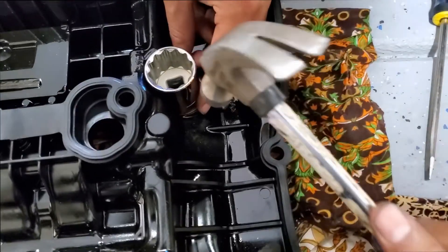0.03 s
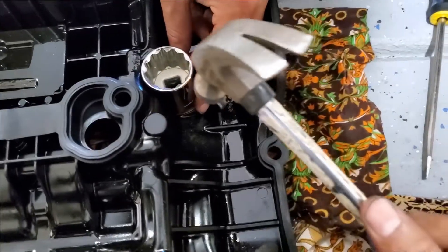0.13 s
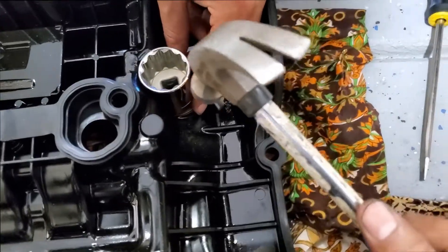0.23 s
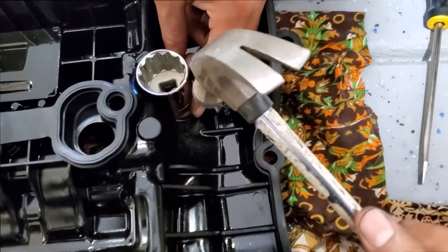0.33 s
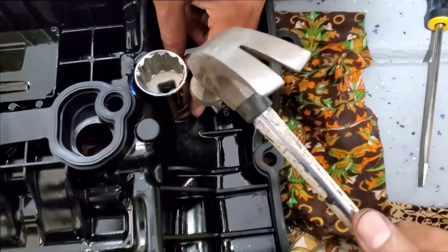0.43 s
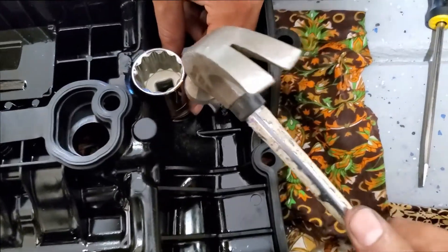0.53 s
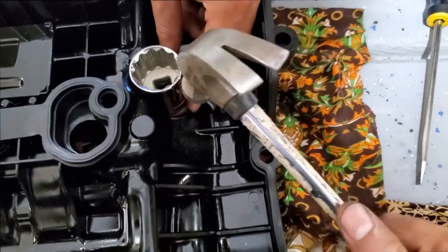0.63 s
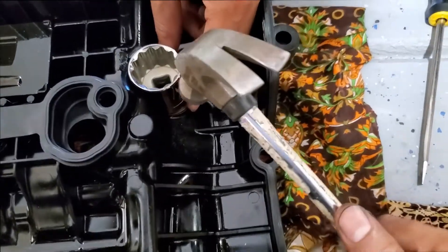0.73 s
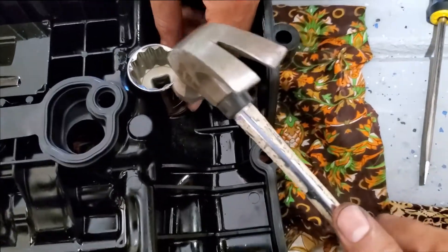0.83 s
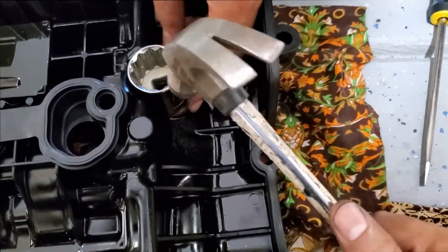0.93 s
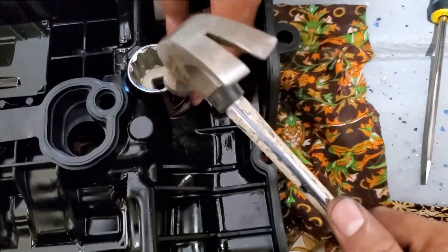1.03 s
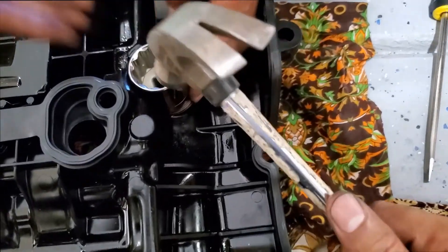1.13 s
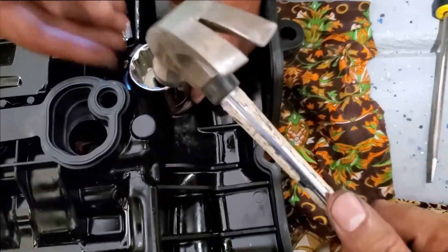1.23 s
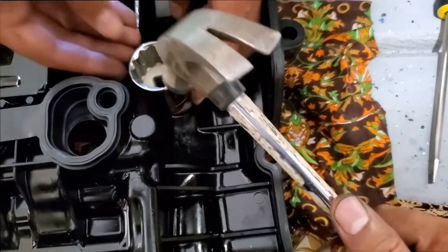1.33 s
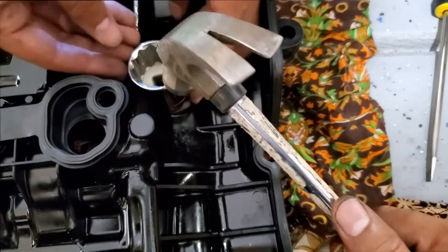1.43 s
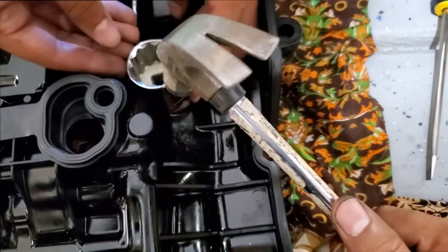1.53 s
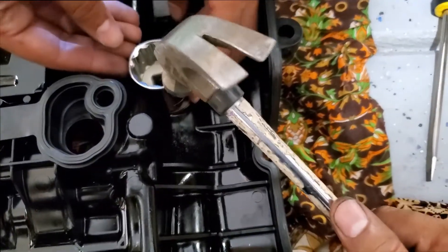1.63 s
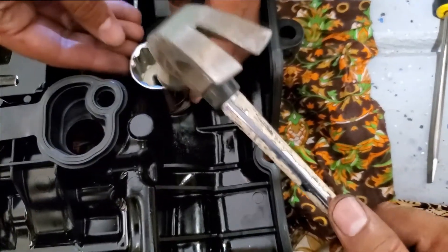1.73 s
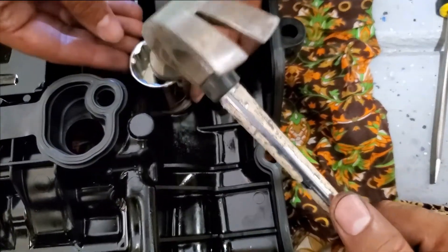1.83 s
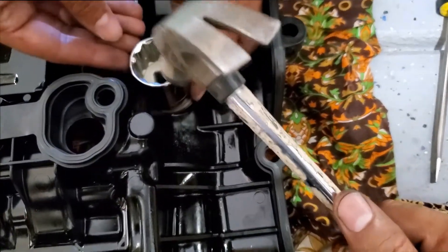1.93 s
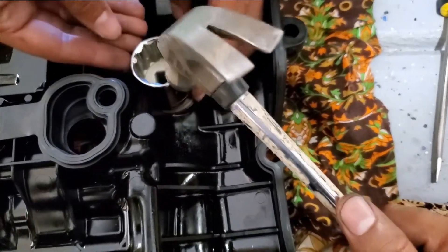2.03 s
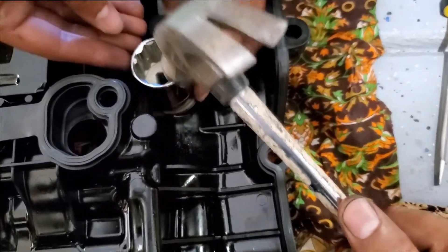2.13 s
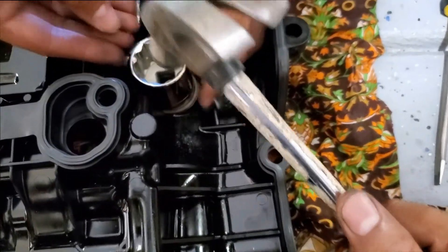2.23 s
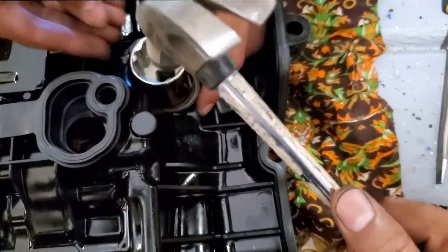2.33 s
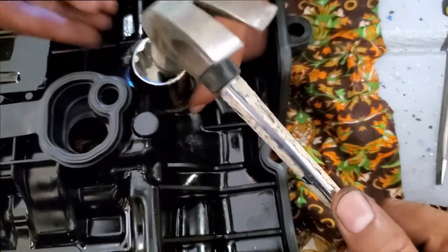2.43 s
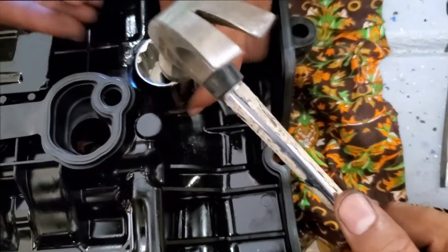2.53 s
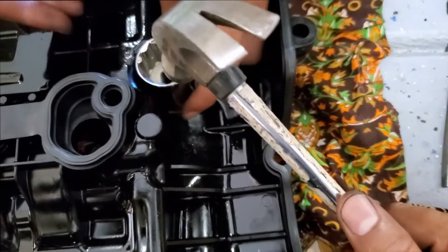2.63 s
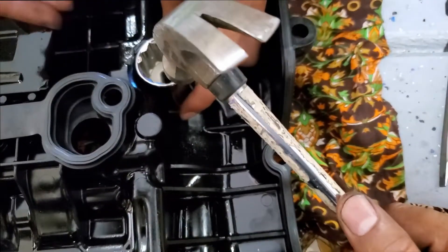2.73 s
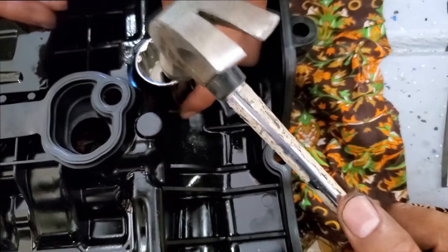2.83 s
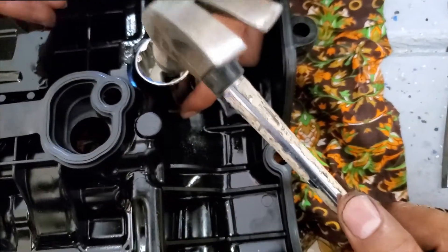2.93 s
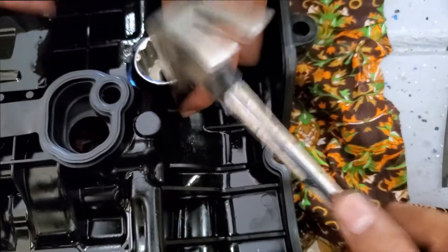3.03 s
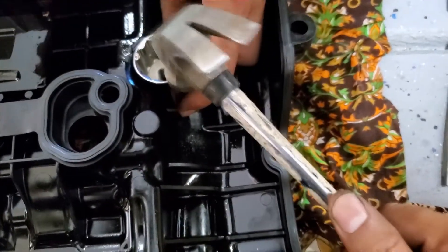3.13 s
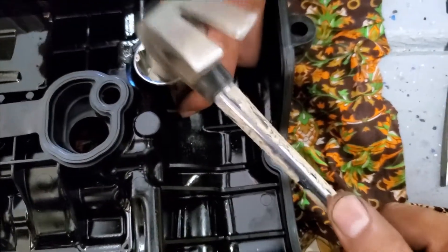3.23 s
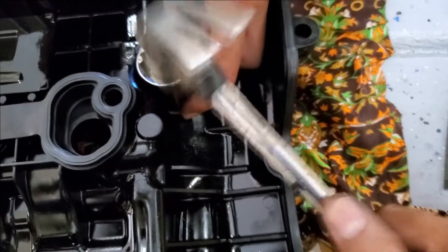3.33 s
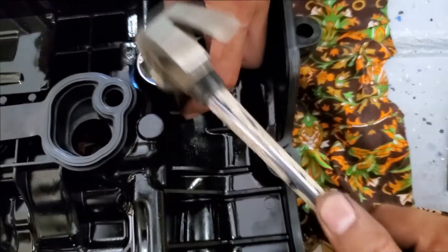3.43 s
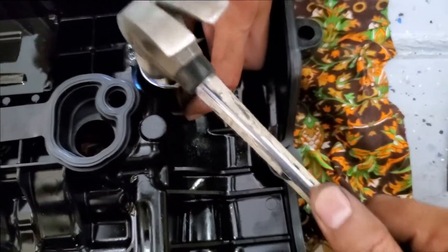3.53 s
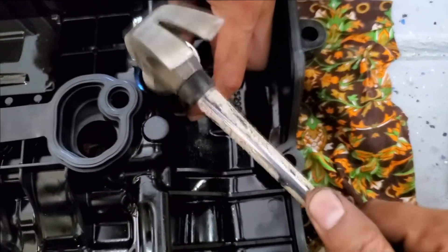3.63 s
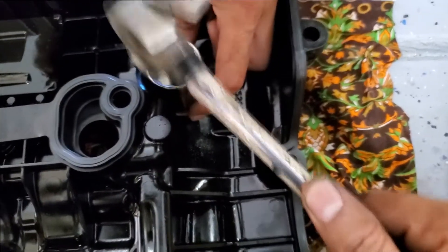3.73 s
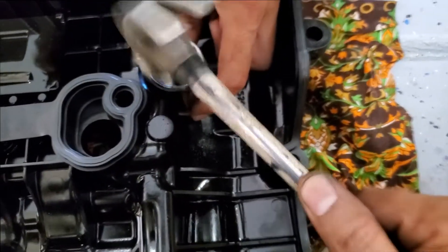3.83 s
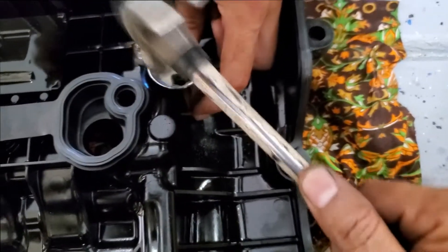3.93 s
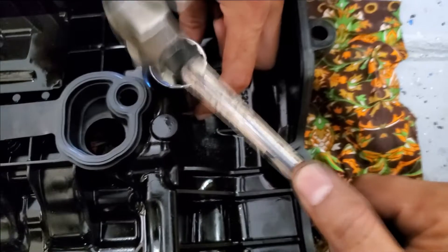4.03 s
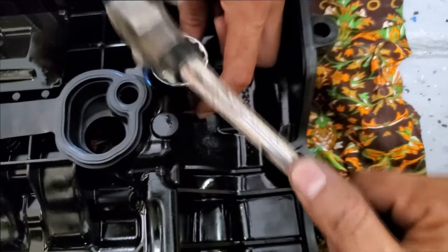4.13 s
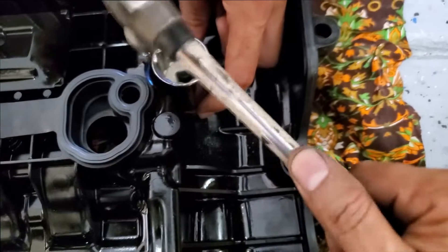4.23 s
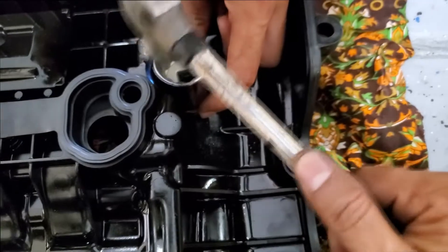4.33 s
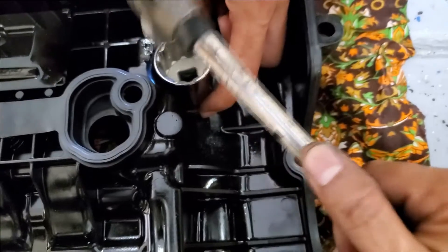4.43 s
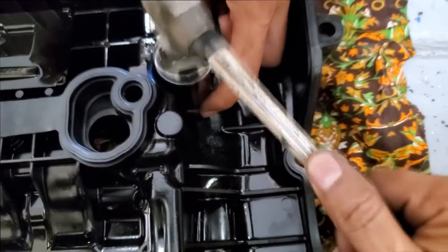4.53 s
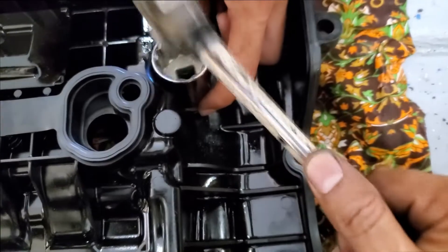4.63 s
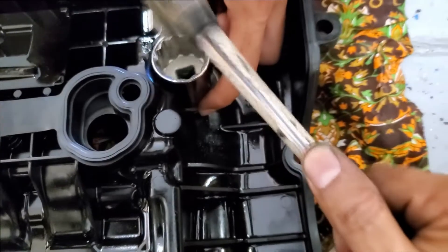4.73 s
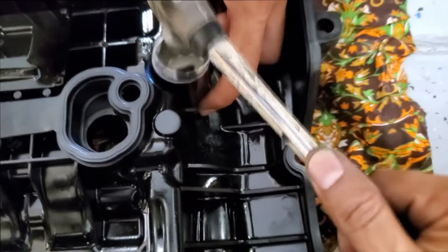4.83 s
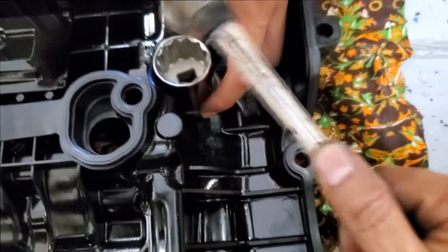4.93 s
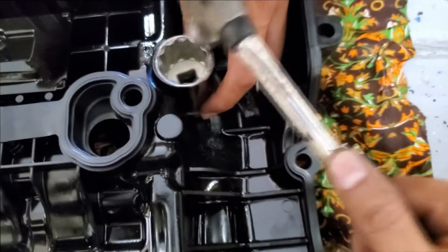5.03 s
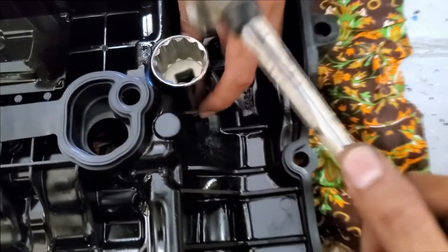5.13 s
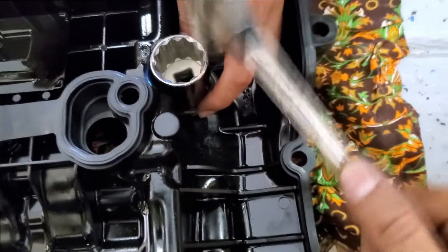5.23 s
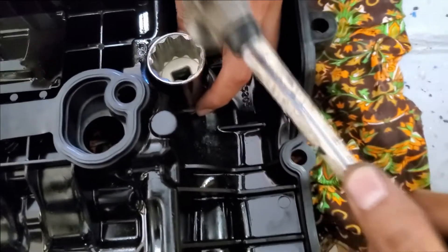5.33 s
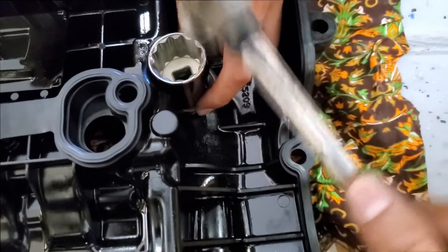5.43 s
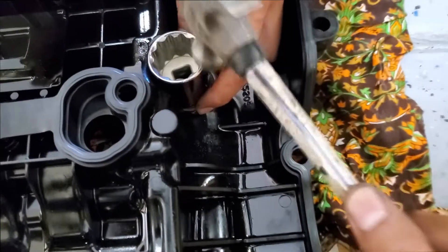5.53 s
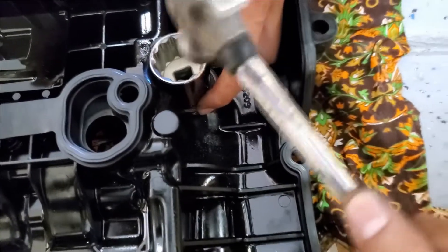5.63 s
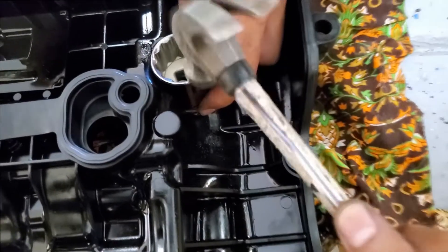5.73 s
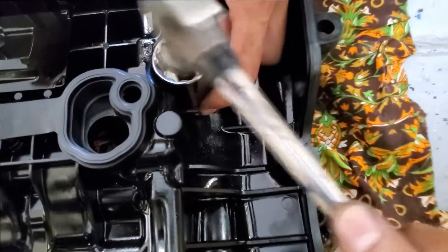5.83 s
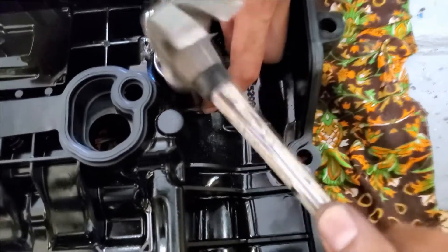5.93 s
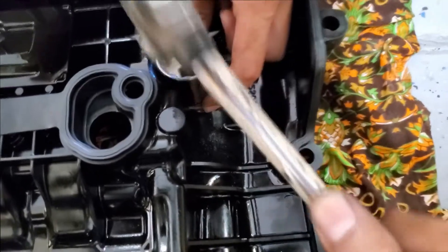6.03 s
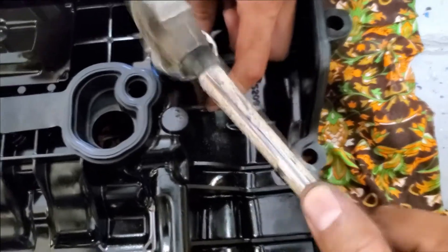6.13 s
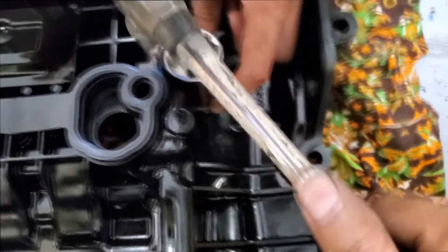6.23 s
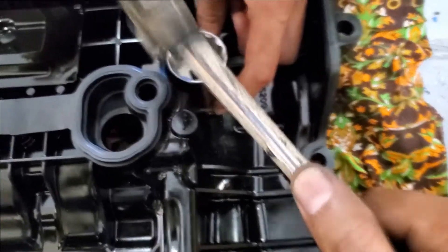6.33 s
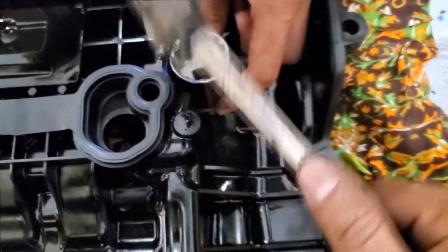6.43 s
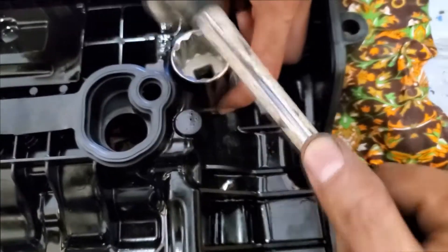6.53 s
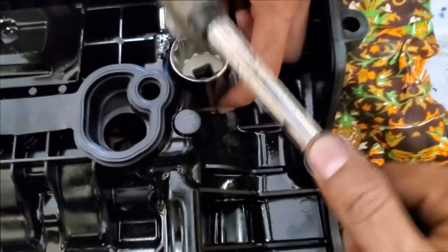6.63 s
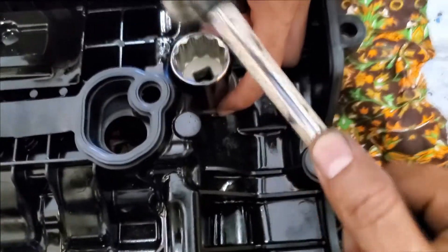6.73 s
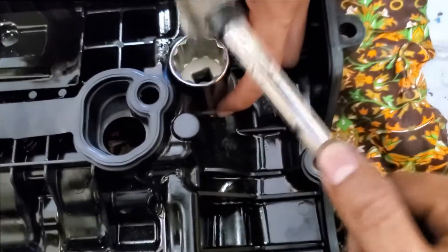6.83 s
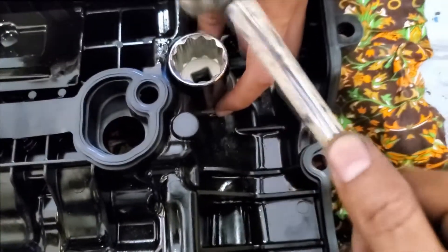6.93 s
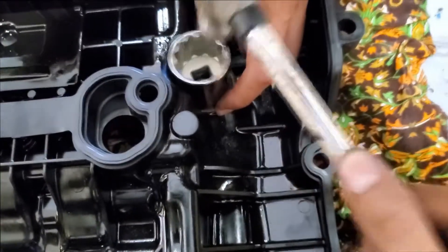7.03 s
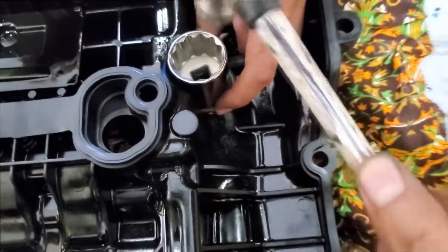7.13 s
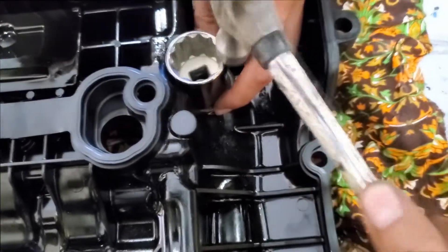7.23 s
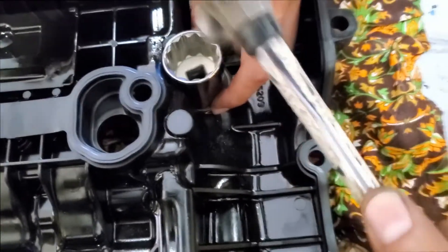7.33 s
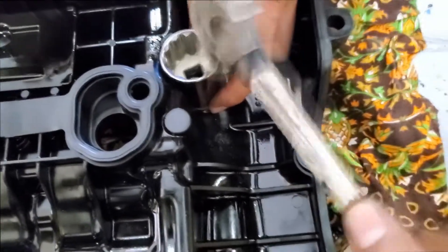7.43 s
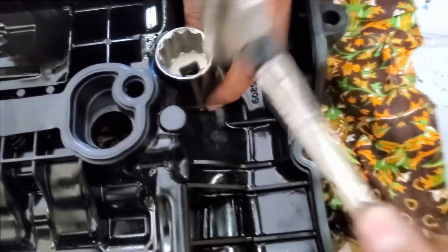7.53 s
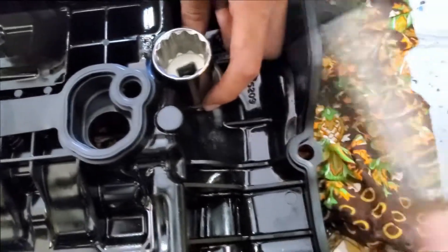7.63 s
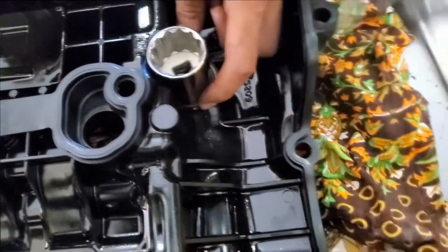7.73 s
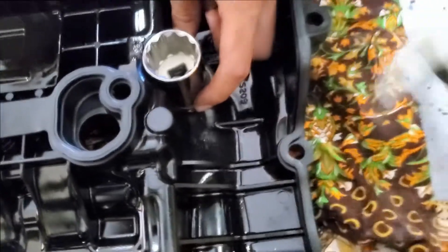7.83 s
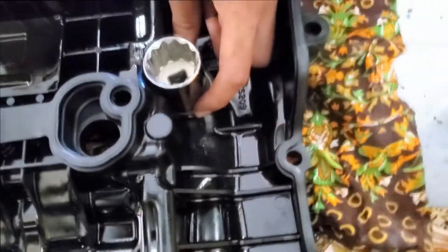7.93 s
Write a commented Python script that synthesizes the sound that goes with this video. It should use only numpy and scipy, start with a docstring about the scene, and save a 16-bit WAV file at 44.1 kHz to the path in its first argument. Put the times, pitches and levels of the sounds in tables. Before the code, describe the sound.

Low motor hum and faint finger rustles, then a steel hammer taps a socket about four times a second, hard ringing clanks in a workshop.

```python
"""In a small workshop a steel hammer taps a socket twenty times into a hollow engine cover, close to a phone.
Each blow sums damped body modes and a crack of noise, and rings the socket on two beating modes near 9 kHz.
The socket sometimes rocks back with a duller knock; before the taps, a faint hiss, then fingers stroke and nudge.
Room reflections are decaying noise; rumble and a wavering harmonic motor hum sink as the tapping starts."""
import sys
import numpy as np
from scipy import signal
from scipy.fft import rfft, irfft
from scipy.io import wavfile

SR = 44100
rng = np.random.default_rng(int(sys.argv[2]) if len(sys.argv) > 2 else 0)


def transcribe(signal):
    """Save signal, clipped to [-1, 1], as a 16-bit WAV file at the path in sys.argv[1]."""
    frames = np.atleast_2d(signal).T
    limited = np.clip(frames, -1, 1)
    pcm = np.round(limited * 32767).astype(np.int16)
    wavfile.write(sys.argv[1], SR, pcm)


N = 352800
HIT = int(.5 * SR)  # samples in one hit
AGE = np.arange(HIT) / SR  # seconds since contact
SIDES = np.array([[1], [-1]])  # left and right


def undb(db):
    """Level law: an amplitude gain is ten to the power of decibels over twenty."""
    return 10 ** (np.asarray(db) / 20)


def fade(t60):
    """Exponential damping: the level falls 60 dB in t60 seconds."""
    return np.exp(-np.log(1000) * AGE / t60)


def unit(x):
    """Root-mean-square normalisation: scale to rms 1."""
    return x / np.sqrt(np.mean(x ** 2))


def unit_attack(x):
    """Onset normalisation: scale so that the first 15 ms have rms 1."""
    onset = x[:, :int(.015 * SR)]
    return x / np.sqrt(np.mean(onset ** 2))


def colour(x, points, size=4096):
    """Minimum-phase filtering: fold the cepstrum of a gain through (Hz, dB) points into a causal response."""
    hz, db = np.transpose(points)
    bins = np.maximum(np.arange(size // 2 + 1) * SR / size, 1)
    gain = undb(np.interp(np.log(bins), np.log(hz), db))
    cepstrum = irfft(np.log(gain))
    cepstrum[1:size // 2] *= 2
    cepstrum[size // 2 + 1:] = 0
    response = irfft(np.exp(rfft(cepstrum)))
    return signal.fftconvolve(x, response[None], axes=1)[:, :x.shape[1]]


def air(count, alike_hz, bass_side):
    """Spatial coherence: stereo noise that is more alike in the bass than in the treble."""
    mid, side = rng.standard_normal((2, count))
    highpass = signal.butter(2, alike_hz, "high", fs=SR, output="sos")
    treble = signal.sosfilt(highpass, side)
    return (mid + SIDES * (treble + bass_side * rng.standard_normal(count))) / np.sqrt(2)


def add(out, s, sound):
    """Superposition: mix a sound in at time s."""
    start = int(s * SR)
    out[:, start:start + HIT] += sound[:, :N - start]


def hammer(knock_db=6.0, ring_db=-3.5, top_per_ring=0.28, ring_reference_db=-10):
    """Impact excitation: every tap knocks the cover, rings the socket and drives it a little further home."""
    # Hammer taps. Each row: start in seconds, knock level in dB before knock_db, lift of the clank band
    # in dB, ring level in dB before ring_db, upper ring mode against the lower in dB, and change of the
    # ring in the first 30 ms or so in dB.
    taps = [(3.037, -18.5, 1, -13, 11, -11.5), (3.344, -22.5, 3, -12.5, -17.5, -7.5),
            (3.588, -20.5, 2, -20.5, -6, -5.5), (3.825, -18.5, 2.5, -21.5, 9, 1.5),
            (4.05, -21, -1, -12.5, -10, -15), (4.289, -20, -3.5, -13.5, -2.5, -2.5),
            (4.524, -23, -2, -8.5, -1.5, -17.5), (4.7599, -24.5, -1, -8.5, -5.5, 4),
            (4.9967, -20.5, -2, -38, 5.5, 8), (5.245, -22, -1.5, -10.7, -14, 2),
            (5.4808, -22.5, 0.7, -13, 5, 3.5), (5.7043, -22.5, -1.5, -10.5, -4, 2),
            (5.9193, -22, 2.5, -21.5, -8, 2), (6.1417, -22.5, 2, -11, 9, 3.5),
            (6.370, -21, -2.5, -13.5, 11.5, 0.5), (6.5855, -23, -1, -8.5, 12.5, -1),
            (6.7922, -20, 2, -8, 3.5, -2.5), (7.012, -22, -2, -14, 13, 4),
            (7.2286, -20.5, -2, -8.5, 2.5, 0.5), (7.452, -22.5, 1.5, -17.5, -9, 7.5)]
    # from the first tap to the last the socket sits firmer and the treble brightens; the boom eases slightly
    steel_db = (-25.5, -22.5)  # treble setting that offsets the knock level of each row
    cover_boom_db = (3.9, 3.5)  # lift of the cover's low modes, 370 to 640 Hz
    clank_share = .35  # part of the clank lift that the treble takes too
    out = np.zeros((2, N))
    for (s, db, clank_db, tone_db, twin_db, change_db), driven in zip(taps, np.linspace(0, 1, len(taps))):
        boom_db = np.interp(driven, (0, 1), cover_boom_db)
        treble_db = np.interp(driven, (0, 1), steel_db) - db + clank_share * clank_db
        # taps with a stronger late ring have a brighter top
        late_ring_db = tone_db + change_db
        top_db = treble_db + top_per_ring * max(late_ring_db - ring_reference_db, -16)
        shape = [(200, 0.0034), (370, boom_db), (640, boom_db), (850, 0.02),
                 (1300, clank_db), (2600, clank_db),
                 (4500, treble_db), (9500, treble_db), (12000, top_db)]
        add(out, s, undb(db + knock_db) * colour(knock(), shape))
        add(out, s, undb(tone_db + ring_db) * ring(twin_db, .39, change_db))
    return out


def knock(crack_db=-5, crack_t60=.028, rise_s=0.00091, crack_pan_db=4):
    """Modal superposition: damped body modes, varied for every landing spot, and a short noise crack."""
    # Modes of cover, socket and hammer head in contact. Each row: frequency in Hz before detuning,
    # bandwidth in Hz, level in dB before scatter and weighting by bandwidth, left minus right in dB,
    # phase lead of the left in radians.
    modes = [(219.6, 150, -16, 5, 2), (252.5, 7.9, -12.5, -6.5, 1), (306, 71, -20.5, 0.5, 2.5),
             (388.7, 13, -9.5, -2.5, -2), (412, 76, -12.5, 4, -0.1), (498, 19, -13, 8.5, -2.5),
             (606.6, 15, -9.5, -7, 2.9), (724, 140, 0, 0.5, 3), (817.5, 98, 1, 7, 1.76),
             (1013.6, 72, -6, 6, 2), (1231, 120, -4.5, 1.5, -1.5), (1331, 38, -14, -1.5, 1.5),
             (1436, 130, -8, -0.5, 2), (1560, 15, -17.5, 2.5, 2.5), (1860, 130, -15, -3, -1.54),
             (2151, 200, -10.5, 1.5, -1.24), (2432, 28, -18, 1, -0.8), (2560, 63, -12, 2.5, 1),
             (2955, 110, -14.5, 7, 3.0), (3410, 100, -14, 2.5, 3), (3470, 19, -25, 0.5, 0),
             (3860, 450, -23.5, 3, -13), (4930, 670, -13.5, 12, -3), (5683, 190, -17.5, 10, 2),
             (6820, 420, -5, 10, 3.5), (6740, 23, -19, 2.5, 2.5), (8180, 90, -16.5, 6.5, 6.5),
             (8860, 810, 6, 4, 3.5), (10960, 160, -17, 11, -10), (12660, 40, -10, -8, 4.5)]
    # Spectrum of the steel-on-steel crack. Each row: frequency in Hz, filter gain in dB.
    crack_colour = [(25, -14), (70, -5.5), (200, -4), (700, -8.5), (1500, -4.5), (4000, -6.5), (7000, -2.5),
                    (10000, -4.5), (15500, -9)]
    body = np.zeros((2, HIT))
    landings = rng.standard_normal((len(modes), 2))
    for k, ((hz, width, db, pan_db, lead), (size, shift)) in enumerate(zip(modes, landings)):
        t = AGE[:int(min(HIT, 3 * SR / width))]  # at most until the mode is 82 dB down
        # short waves depend most on where the hammer lands
        scatter_db = min(hz / 900, 3)
        detune_hz = shift * min(.008 * hz, width / 3)
        phase = 2 * np.pi * (hz + detune_hz) * t + SIDES * lead / 2
        gain = (-1) ** k * width * undb(db + scatter_db * size + SIDES * pan_db / 2)
        body[:, :len(t)] += gain * np.exp(-np.pi * width * t) * np.sin(phase)
    contact = 1 - np.exp(-AGE / rise_s)
    body = ports(body * contact, 750)
    body = signal.sosfilt(signal.butter(1, 90, "high", fs=SR, output="sos"), body)
    burst = air(HIT, 900, 0.23) * fade(crack_t60) * contact
    crack = colour(burst, crack_colour) * undb(SIDES * crack_pan_db / 2)
    return unit_attack(body) + undb(crack_db) * unit_attack(crack)


def ports(x, alike_hz):
    """Long-wave coherence: wavelengths long against the spacing reach both microphone ports alike."""
    highpass = signal.butter(2, alike_hz, "high", fs=SR, output="sos")
    side = signal.sosfiltfilt(highpass, (x[0] - x[1]) / 2, padtype=None)
    return x.mean(axis=0) + SIDES * side


def ring(twin_db, t60, change_db, change_s=0.034, rise_s=0.00079):
    """Beating of a split mode: two close tones beat, and the ring as a whole fades or swells in the first 30 ms
    or so."""
    # The socket's oval mode, split in two by its shape. Each row: frequency in Hz,
    # phase lead of the left in radians.
    modes = [(8858.7, -1.0), (8952, 1.7)]
    pans_db = (7.5, 4.5)  # left minus right: the two modes radiate at different angles
    weights = undb(np.array([0, twin_db]))
    weights = weights / np.linalg.norm(weights)
    tone = np.zeros((2, HIT))
    for weight, (hz, lead), pan_db, start in zip(weights, modes, pans_db, rng.random(2)):
        phase = 2 * np.pi * (hz * AGE + start) + SIDES * lead / 2
        tone += weight * unit(undb(SIDES * pan_db / 2)) * np.sin(phase)
    changed = 1 - np.exp(-(AGE / change_s) ** 4)
    rise = 1 - np.exp(-AGE / rise_s)
    return np.sqrt(2) * tone * fade(t60) * undb(change_db * changed) * rise


def rocks():
    """Contact stiffness: the socket rocks back onto its seat, and a softer contact excites less treble."""
    # Rocking knocks. Each row: start in seconds, level in dB before the dulling filter.
    knocks = [(3.0715, -16), (3.262, -43), (3.373, -18), (3.6165, -20.5), (4.833, -44.5), (4.849, -36.5),
              (4.862, -33.5)]
    firm_hz, firm_db = 850, -19.5  # at this level the knock dulls above this frequency
    db_per_octave = 25.5  # that frequency halves for every such drop in level
    out = np.zeros((2, N))
    for s, db in knocks:
        dull_hz = firm_hz * 2 ** ((db - firm_db) / db_per_octave)
        shape = [(dull_hz, 0), (2 * dull_hz, -12), (6 * dull_hz, -18), (16 * dull_hz, -34)]
        add(out, s, undb(db) * colour(knock(), shape))
    return out


def nudges():
    """Weak impact: fingers nudge the socket, giving light ticks and a quickly damped ring."""
    # Nudges. Each row: start in seconds, tick level in dB before its filter, ring level in dB.
    ticks = [(0.99, -61, -87.5), (1.144, -59, -83), (1.207, -73, -89.5), (1.231, -69.5, -97),
             (1.264, -57.5, -72), (1.281, -57, -63.5), (1.307, -55.5, -57)]
    shape = [(800, 6), (1400, -2.0), (2600, 9.0), (4000, 0)]
    out = np.zeros((2, N))
    for s, db, ring_db in ticks:
        tick = undb(db) * colour(knock(), shape)
        add(out, s, tick + undb(ring_db) * ring(0, 0.099, 0))
    return out


def fingers(grain_db=1.5, pan_db=6):
    """Friction noise: after a faint opening hiss, skin slides over the smooth parts in small slips."""
    # Spectrum of the hiss. Each row: frequency in Hz, filter gain in dB.
    slide_colour = [(300, -20), (1000, -4), (1500, -5), (7200, 0), (8000, -9.5), (10500, -5), (15500, -8.5)]
    # Hiss swells: a faint opening hiss, then strokes of the hand. Each row: start in seconds,
    # length in seconds, level in dB before the swell and sag.
    swells = [(0, 0.72, -68.5), (0.505, 0.35, -52.5), (0.872, 0.17, -58), (1.075, 0.24, -59.5),
              (1.71, 0.043, -70), (2.114, .11, -64.5), (2.554, 0.06, -69)]
    slips = np.repeat(rng.standard_normal(N // 200 + 1), 200)[:N]  # a new strength every 200 samples
    hiss = unit(colour(air(N, 900, 0.21) * undb(grain_db * slips), slide_colour))
    envelope = sum(undb(db) * swell(s, length_s) for s, length_s, db in swells)
    return hiss * undb(SIDES * pan_db / 2) * envelope


def swell(s, length_s, attack_s=0.076, release_s=0.034, sag_db_per_s=26):
    """Amplitude envelope: the hiss rises linearly, sags, as under a slowing hand, and then dies away."""
    elapsed = np.arange(N) / SR - s
    age = np.maximum(elapsed, 0)
    past_end = np.maximum(age - length_s, 0)
    rise = np.minimum(age / attack_s, 1)
    return rise * undb(-sag_db_per_s * age) * np.exp(-past_end / release_s)


def workshop(direct, t60=0.3, treble_t60=0.18, build_s=0.0051):
    """Diffuse reverberation: dense reflections from bench and walls, with the treble absorbed first."""
    # Spectrum of the reverberation. Each row: frequency in Hz, filter gain in dB.
    room_colour = [(60, -11.5), (250, -13), (450, -11.5), (800, -13), (1400, -12), (3000, -10),
                   (7000, -13.5), (9000, -14), (15000, -10)]
    noise = air(HIT, 600, 0.12)
    low = signal.sosfilt(signal.butter(1, 5000, fs=SR, output="sos"), noise)
    build = 1 - np.exp(-(AGE / build_s) ** 2)
    tail = (low * fade(t60) + (noise - low) * fade(treble_t60)) * build
    tail = colour(tail / np.sqrt(np.sum(tail ** 2) / 2), room_colour)  # unit energy per side, then coloured
    return signal.fftconvolve(direct, tail, axes=1)[:, :N]


def rumble(waver_db=2.0, drift=0.0089, motor_hz=48.2):
    """Harmonic series over noise: a motor hum at multiples of its wandering turning rate, and low rumble."""
    # Background spectrum. Each row: frequency in Hz, filter gain in dB before normalisation.
    rumble_colour = [(25, -16), (60, -1), (100, -6.5), (125, -12.5), (190, -13), (290, -19), (350, -22),
                     (750, -23), (1000, -30), (1800, -29.5), (4000, -38.5), (7000, -46), (9000, -55.5),
                     (15500, -41.5)]
    # Motor hum. Each row: multiple of the turning rate, mean level in dB against the rumble.
    harmonics = [(2, -4.5), (3, -9.5), (4, -15), (5, -15), (6, -17)]
    level_db, sink_db = -56, -10  # rumble level before the tapping, and its eventual change
    sink_start_s, sink_time_s = 2.95, 1.0
    turns = np.cumsum(motor_hz * (1 + drift * wander(4.5))) / SR
    hum = np.zeros(N)
    for k, db in harmonics:
        gain = np.sqrt(2) * undb(db + waver_db * wander(6.8))
        hum += gain * np.sin(2 * np.pi * (k * turns + rng.random()))
    noise = unit(colour(air(N, 700, .45), rumble_colour))
    since_start = np.maximum(np.arange(N) / SR - sink_start_s, 0)
    sunk = 1 - np.exp(-since_start / sink_time_s)
    return (noise + hum) * undb(level_db + sink_db * sunk)


def wander(rate):
    """Random modulation: straight lines join normal random values drawn about rate times a second."""
    count = int(rate * N / SR) + 2
    return np.interp(np.linspace(0, count - 1, N), np.arange(count), rng.standard_normal(count))


def scene():
    """Superposition of the direct sound from the bench, its reverberation and the background."""
    direct = hammer() + rocks() + nudges() + fingers()
    return direct + workshop(direct) + rumble()


def record(dry):
    """Saturation and band limiting: the phone rounds peaks near full scale and cuts above 15.9 kHz."""
    rounded = dry / (1 + dry ** 6) ** (1 / 6)
    lowpass = signal.ellip(8, .2, 80, 15900, fs=SR, output="sos")
    return signal.sosfilt(lowpass, rounded)


dry = scene()
out = record(dry)
transcribe(out)
```